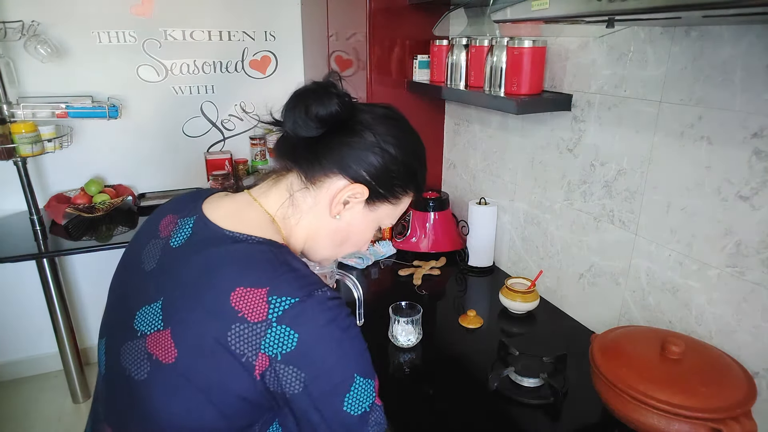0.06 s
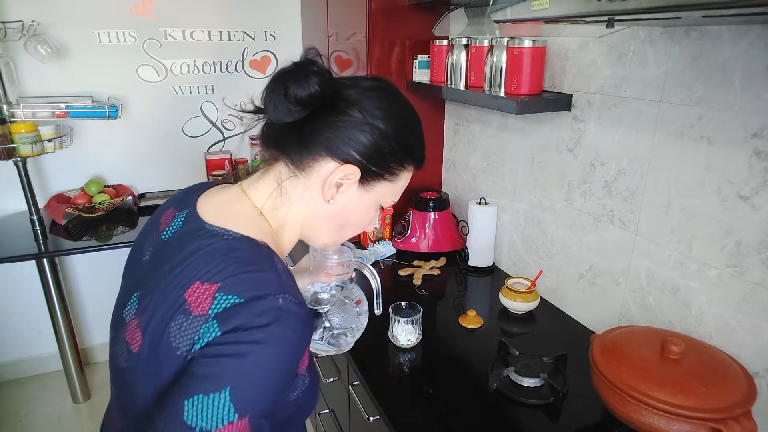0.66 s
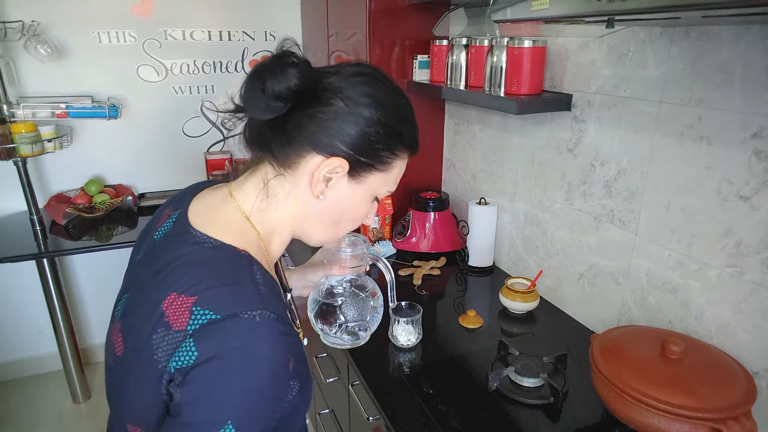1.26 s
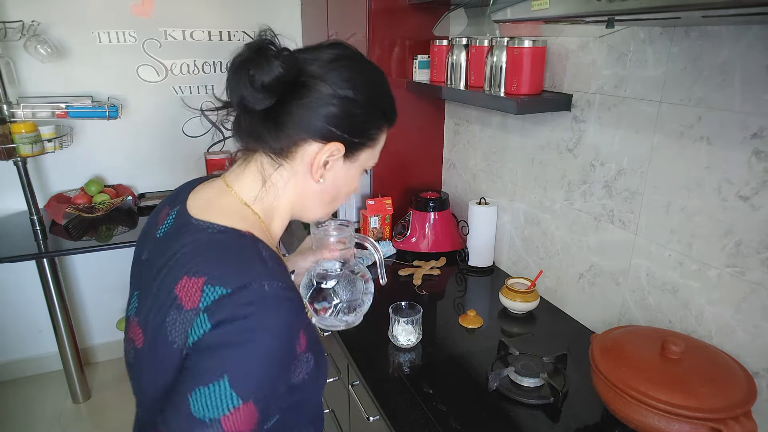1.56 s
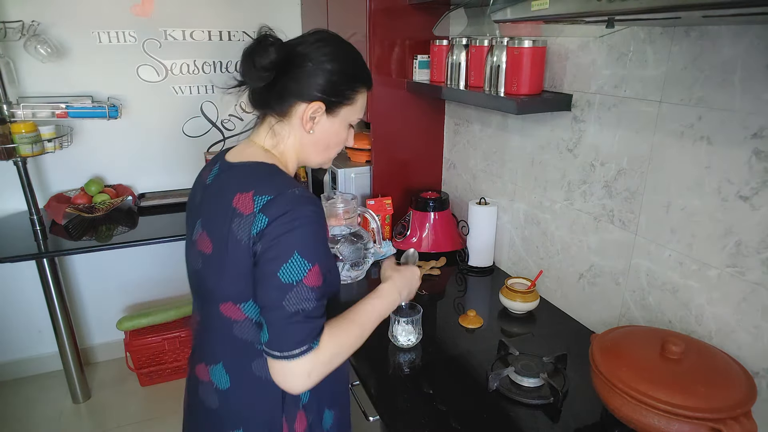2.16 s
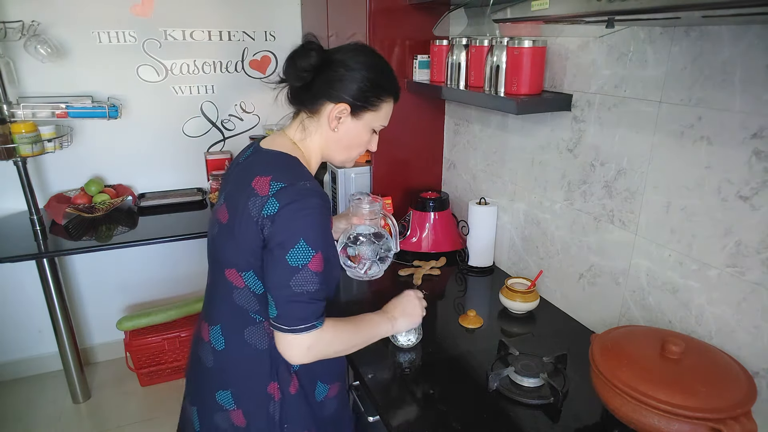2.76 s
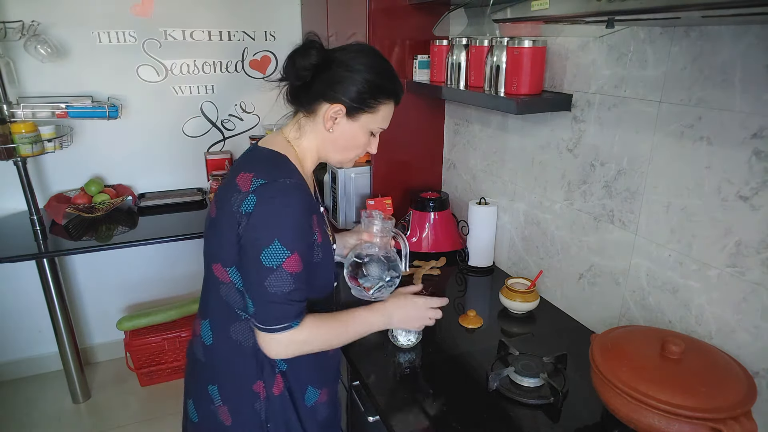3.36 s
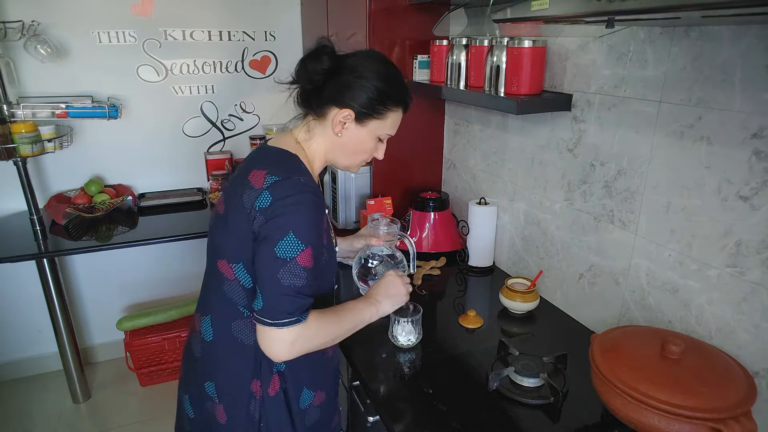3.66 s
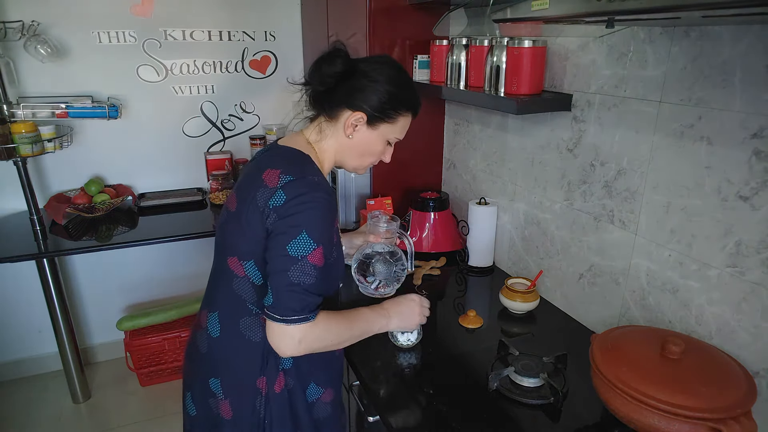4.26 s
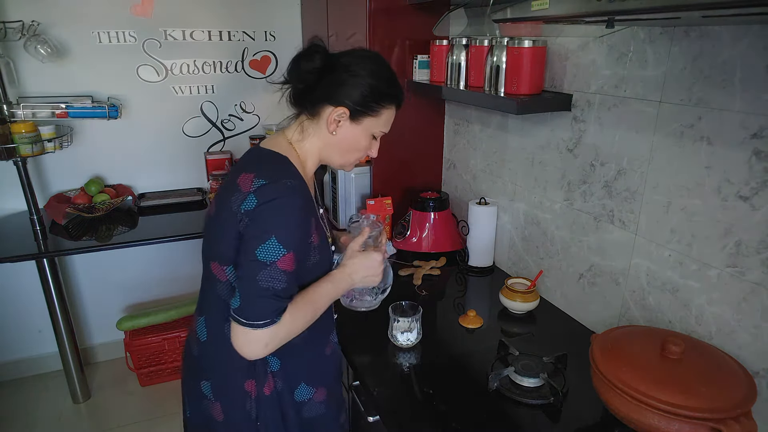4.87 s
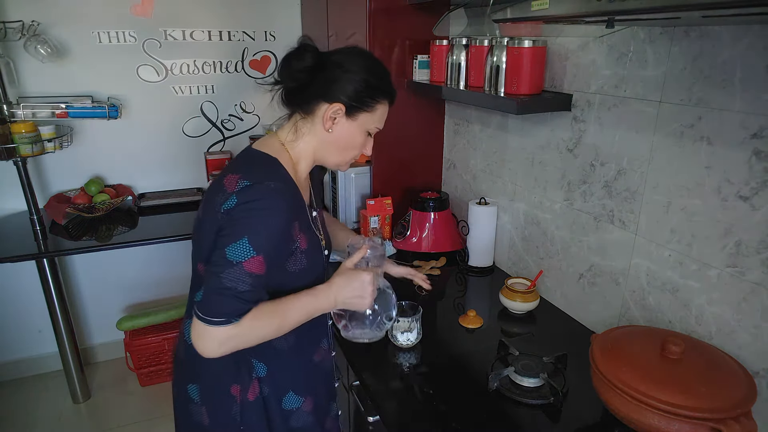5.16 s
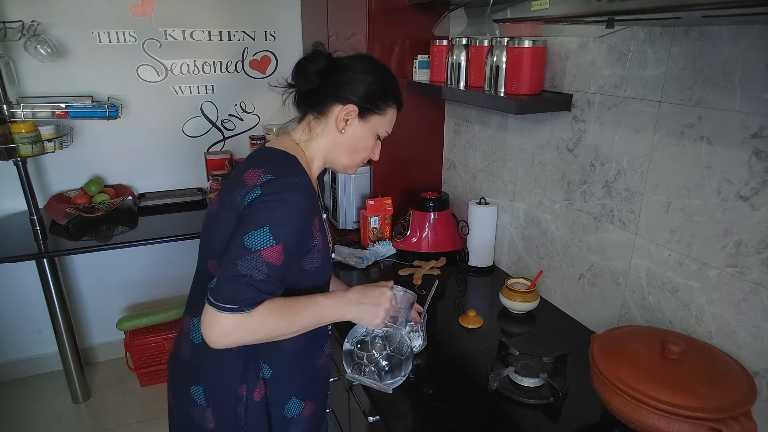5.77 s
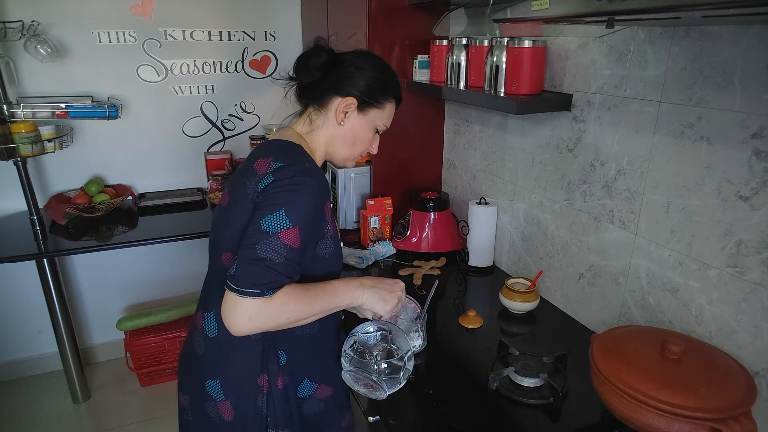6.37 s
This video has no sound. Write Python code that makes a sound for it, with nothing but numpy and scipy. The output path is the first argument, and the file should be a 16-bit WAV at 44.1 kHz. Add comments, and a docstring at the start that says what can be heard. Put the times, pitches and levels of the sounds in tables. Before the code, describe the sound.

In a hard-walled kitchen, steel cutlery jangles, a drawer closes, a spoon taps a glass and is set down, and a jug bumps softly.

```python
"""Cutlery rattles as a spoon is taken from a drawer; the drawer rumbles shut on its runners.
The spoon clinks in a drinking glass and is put down on the stone counter. A water jug changes hands
with dull bumps, and the glass is nudged along the counter. Contacts are damped modes and noise bursts;
friction is noise that swells with each slip. All is heard mostly through a hard-walled kitchen,
over a low rumble and a faint whirr."""
import sys
import numpy as np
from scipy import signal
from scipy.fft import rfft, irfft, next_fast_len
from scipy.io import wavfile
from scipy.ndimage import map_coordinates

SR = 44100
rng = np.random.default_rng(int(sys.argv[2]) if len(sys.argv) > 2 else 0)


def log_audio(samples):
    """Write samples as a 16-bit WAV file to the path given in sys.argv[1]."""
    # one column per channel
    frames = np.atleast_2d(samples).T
    # limit to full scale, then quantise
    limited = np.clip(frames, -1, 1)
    pcm = np.round(limited * 32767).astype(np.int16)
    wavfile.write(sys.argv[1], SR, pcm)


N = 282228
T = np.arange(int(.6 * SR)) / SR  # time axis of one contact or room tail, s
STEEL_BRIGHT_HZ = 16120

# Steel clash spectrum. Each row: frequency in Hz, relative density in dB.
CLASH_SPECTRUM = [(150, -80.5), (350, -33.5), (700, -7), (1000, -21), (1800, -6.5), (3800, -3), (4700, -7),
                  (5700, -1), (8000, -4), (9800, 1.5), (11000, 1), (15500, 3)]
# Dull bump spectrum. Each row: frequency in Hz, relative density in dB.
BUMP_SPECTRUM = [(35, -59), (75, -9), (115, 7.5), (160, -4.5), (200, -15.5), (270, 4.5), (360, -6.5),
                 (470, -15), (680, -17), (1000, -34), (3000, -46)]


def amp(db):
    """Decibels to gain."""
    return 10 ** (np.asarray(db) / 20)


def unit(x):
    """Scale to rms 1."""
    return x / np.sqrt(np.mean(x ** 2) + 1e-20)


def along(points, hz):
    """Interpolate (Hz, value) points on a log frequency axis."""
    knots_hz, values = np.transpose(points)
    return np.interp(np.log(hz + 1), np.log(knots_hz), values)


def filtered(x, response):
    """Zero-phase filter with gain response(hz)."""
    n = x.shape[-1]
    size = next_fast_len(n + SR // 10)
    return irfft(rfft(x, size) * response(np.fft.rfftfreq(size, 1 / SR)), size)[..., :n]


def noise(spectrum, size):
    """Coloured noise of rms 1."""
    return unit(filtered(rng.standard_normal(size), lambda hz: amp(along(spectrum, hz))))


def wobble(rate_hz):
    """Smooth random curve with knots at rate_hz."""
    knots = rng.standard_normal(int(N * rate_hz / SR) + 4)
    return map_coordinates(knots, [np.arange(N) * rate_hz / SR])


def diffuse(size):
    """White stereo noise, alike in the bass, unrelated in the treble."""
    # Each row: frequency in Hz, left-right correlation.
    coherence = [(30, 0.31), (70, 0.5), (250, .86), (500, 0.72), (900, 0.11), (1500, -0.18), (3000, -0.026),
                 (12000, -0.019)]

    def mid_side_gains(hz):
        angle = np.arccos(np.clip(along(coherence, hz), -1, 1)) / 2
        return np.array([np.cos(angle), np.sin(angle)])

    mid, side = filtered(rng.standard_normal((2, size)), mid_side_gains)
    return np.array([mid + side, mid - side])


def kitchen(x, direct_db=-8, build_s=0.00048, sparse_s=0.0078):
    """Weak direct sound, a few near reflections, a dense tail off tiles and stone; new per call."""
    # Each row: frequency in Hz, reverberation t60 in s.
    room_decay = [(100, 0.48), (400, 0.52), (1000, 0.48), (3000, 0.44), (7000, 0.38), (15000, 0.31)]
    hz, t, spectra = signal.stft(diffuse(len(T)), SR, nperseg=256)
    decay = amp(-60 * t / along(room_decay, hz)[:, None])
    tail = signal.istft(spectra * decay, SR, nperseg=256)[1][:, :len(T)]
    tail *= 1 - np.exp(-T / build_s)
    # early reflections arrive singly, then merge
    spikiness = np.exp(-T / sparse_s)
    tail *= np.exp(spikiness * rng.standard_normal(tail.shape) - spikiness ** 2)
    tail /= np.linalg.norm(tail, axis=1, keepdims=True)
    tail[:, 0] += amp(direct_db)
    return signal.fftconvolve(x[None], tail, axes=1)[:, :len(x)]


def add_in_room(out, start_s, x, direct_db=-8):
    """Mix contact x, with its reverberation, into out."""
    part = out[:, max(round(start_s * SR), 0):][:, :len(T)]
    part += kitchen(x, direct_db)[:, :part.shape[1]]


def blow(x, db):
    """Scale a contact to the energy of 30 ms at level db."""
    return amp(db) * x * np.sqrt(.03 * SR / np.sum(x ** 2))


def softness(hz, bright_hz):
    """Low-pass gain: a softer contact excites less treble."""
    return 1 / np.sqrt(1 + (hz / bright_hz) ** 4)


def ring(modes, bright_hz, scatter_db=1):
    """Decaying modes; their strengths vary slightly per contact."""
    hz, db, t60_s = np.transpose(modes)[:, :, None]
    gain = amp(db + scatter_db * rng.standard_normal(hz.shape)) * softness(hz, bright_hz)
    return np.sum(gain * amp(-60 * T / t60_s) * np.sin(2 * np.pi * hz * T), axis=0)


def burst(spectrum, t60_s, bright_hz=SR):
    """Many close, damped modes as decaying coloured noise."""
    return filtered(noise(spectrum, len(T)), lambda hz: softness(hz, bright_hz)) * amp(-60 * T / t60_s)


def flurry(start_s, length_s, count, scatter_db=4.0):
    """Unevenly spaced small contacts. Each row: time in s, level offset in dB."""
    chance = rng.random((count, 2))
    times_s = start_s + length_s * (np.arange(count) + chance[:, 0] / 2) / count
    return zip(times_s, scatter_db * (2 * chance[:, 1] - 1))


def rub(strokes, spectrum, attack_s, release_s, grain_db, slip_hz):
    """Friction in the room: strokes rise, hold and die away; the noise swells with each slip."""
    t = np.arange(N) / SR
    effort = np.zeros(N)
    for start_s, length_s, db in strokes:
        rise = np.clip((t - start_s) / attack_s, 0, 1)
        fall = np.exp(-np.maximum(t - start_s - length_s, 0) / release_s)
        effort += amp(db) * rise * fall
    friction = unit(noise(spectrum, N) * amp(grain_db * wobble(slip_hz)))
    return kitchen(effort * friction)


def room_noise(level_db=-60.0):
    """Steady low rumble and a faint whirr in a few broad bands."""
    # Each row: frequency in Hz, relative density in dB.
    air_spectrum = [(20, -13), (48, 12), (70, 0), (110, 0.5), (170, -7.5), (260, 3.5), (400, -5), (800, -8),
                    (1200, -10.5), (2300, -11.5), (3200, -23), (5500, -25), (12500, -24.5), (15500, -30)]
    # Each row: centre in Hz, width in Hz, relative peak in dB.
    whirr_bands = [(1463, 130, -5.5), (1803, 190, 0.5), (4257, 570, -12), (7380, 850, -18.5),
                   (10400, 430, -31.5)]

    def response(hz):
        whirr_power = sum(amp(db) ** 2 / (1 + (2 * (hz - centre_hz) / width_hz) ** 2) ** 2
                          for centre_hz, width_hz, db in whirr_bands)
        return np.sqrt(amp(along(air_spectrum, hz)) ** 2 + whirr_power)

    return unit(filtered(diffuse(N), response)) * amp(level_db)


def cutlery(stirred_ring_db=-4.5, bright_at_db=-19, db_per_octave=27):
    """Steel pieces clash and ring, damped by one another and screened by the drawer."""
    # Each row: start in s, clash level in dB, ring over clash in dB.
    contacts = [(0.001, -18.5, -6), (0.137, -22.5, -35), (0.149, -24, -9), (0.2129, -27.5, -16),
                (0.4262, -37, -7.5), (0.527, -43, -10.5), (1.932, -57.5, -7.5)]
    # The hand stirs the pieces. Each row: start in s, length in s, mean clash level in dB.
    rummages = [(0.062, 0.083, -36.5), (0.22, 0.062, -31), (0.304, 0.08, -46)]
    # Each row: frequency in Hz, relative level in dB, t60 in s.
    steel_modes = [(4200, -17, 0.29), (5510, 3, 0.0675), (5700, -16.5, .1), (9400, 1, 0.0757),
                   (8570, -5.5, 0.1), (9870, 6, 0.1), (12260, -15.5, .15), (12730, -14.5, 0.16),
                   (13200, -6.5, 0.066), (13600, -5, 0.1676), (14700, -19, 0.23), (14620, -11.5, 0.1034)]
    stirred = [(time_s, db + offset_db, stirred_ring_db)
               for start_s, length_s, db in rummages
               for time_s, offset_db in flurry(start_s, length_s, count=5)]
    out = np.zeros((2, N))
    for start_s, db, ring_db in contacts + stirred:
        bright_hz = STEEL_BRIGHT_HZ * 2 ** ((db - bright_at_db) / db_per_octave)  # harder is brighter
        clash = blow(burst(CLASH_SPECTRUM, t60_s=0.037, bright_hz=bright_hz), db)
        chime = blow(ring(steel_modes, bright_hz), db + ring_db)
        add_in_room(out, start_s, chime + clash, direct_db=-9.5)
    return out


def lifted_piece(start_s=0.538, level_db=-48.5):
    """One piece comes clear of the damping pile and rings thinly."""
    # Each row: frequency in Hz, relative level in dB, t60 in s.
    free_modes = [(4021, 5, 0.22), (7330, -13, 0.18), (9430, -2, 0.21), (12020, -15, 0.2),
                  (13840, -10, 0.17)]
    out = np.zeros((2, N))
    add_in_room(out, start_s, blow(ring(free_modes, STEEL_BRIGHT_HZ), level_db))
    return out


def drawer_and_jug_bumps(settle_s=5.06, settle_db=-49.5, fade_db_per_s=8):
    """Soft, ringless bumps; a last run of small ones fades as the jug settles in the hand."""
    # Each row: start in s, level in dB.
    bumps = [(0.679, -56), (1.224, -50.5), (1.529, -53.5), (2.334, -60), (3.264, -61), (4.866, -38.5),
             (4.882, -38.5), (4.949, -44.5), (5.192, -48)]
    settling = [(time_s, settle_db - fade_db_per_s * (time_s - settle_s) + offset_db)
                for time_s, offset_db in flurry(settle_s, length_s=0.55, count=8)]
    out = np.zeros((2, N))
    for start_s, db in bumps + settling:
        add_in_room(out, start_s, blow(burst(BUMP_SPECTRUM, t60_s=0.12), db))
    return out


def drawer_slide():
    """The drawer rumbles on its runners."""
    # Each row: start in s, length in s, level in dB.
    pushes = [(1.03, 0.051, -55), (1.07, 0.14, -52.5), (1.215, 0.088, -45.5), (1.325, 0.097, -47.5),
              (1.425, 0.036, -49)]
    # Each row: frequency in Hz, relative density in dB.
    runner_spectrum = [(70, -7.5), (190, -25), (255, 9.5), (330, -18), (400, 4), (490, -10), (580, -1.5),
                       (900, -8), (1150, -14.5), (1550, -9.5), (2300, -18.5), (3500, -15), (9000, -23.5),
                       (15500, -27)]
    return rub(pushes, runner_spectrum, attack_s=0.005, release_s=0.022, grain_db=1.5, slip_hz=140)


def arm_swish():
    """Cloth brushes lightly as the arm reaches over the glass."""
    # Each row: start in s, length in s, level in dB.
    strokes = [(2.31, 0.23, -64)]
    # Each row: frequency in Hz, relative density in dB.
    swish_spectrum = [(3000, -23.5), (6000, -10.5), (9500, 0.5), (12000, -8.5), (15500, -7.5)]
    return rub(strokes, swish_spectrum, attack_s=0.058, release_s=0.11, grain_db=7.5, slip_hz=50)


def glass_clinks(free_ring_db=10.5, weight_damping_db=19, free_knock_db=-16, weight_knock_db=15):
    """The spoon clacks, rings the glass and knocks the counter; weight trades ring for knock. The heavy knock
    at 5.38 s is the glass itself, just before it slides."""
    # Each row: start in s, clack level in dB, weight (0 free tap, 1 heavy contact), treble cutoff in Hz.
    clinks = [(2.728, -43.5, 0.044, 5900), (2.929, -39.5, 0.025, 14000), (2.9339, -32, 0.022, 14900),
              (3.8515, -46, 0.56, 3600), (4.296, -41.5, 0.27, 15000), (4.359, -26, 0.91, 3800),
              (4.371, -31, 0.64, 15500), (4.44, -44, 0.33, 2900), (5.38, -54.5, 1, 1920),
              (5.502, -63.5, 0.033, 10100), (5.572, -66, 0.076, 9000)]
    # Each row: frequency in Hz, relative level in dB, t60 in s.
    glass_modes = [(902, -19, 0.16), (2610, -7, 0.44), (2645, -14, 0.12), (3120, -20.5, 0.13),
                   (5992, -37, 0.085), (6358, -6, 0.13), (6358, 2.5, 0.045), (6840, -21, 0.061),
                   (8240, -21, 0.084), (9410, -18, .13), (10740, -7, .1), (10690, -3, .14),
                   (11680, -6, 0.11), (11950, -2, 0.067), (12000, -11.5, 0.19), (13600, -20, 0.18),
                   (14900, -12.5, .15), (15440, -17, .15)]
    # Each row of both: frequency in Hz, relative density in dB.
    clack_spectrum = [(150, -39), (300, -14), (600, -26), (900, -5), (1150, -10.5), (1600, -7.5),
                      (2500, 0.5), (3400, -9), (4200, -8), (5000, -17), (6500, -7.5), (8000, -39),
                      (11500, -9.5), (16000, -37)]
    counter_spectrum = [(40, -34.5), (110, -3.5), (165, -13.5), (280, -11), (390, -11), (520, -5.5),
                        (900, 4), (1200, -7), (1550, 2), (3000, -24), (8000, -62.5)]
    out = np.zeros((2, N))
    for start_s, db, weight, bright_hz in clinks:
        clack = blow(burst(clack_spectrum, t60_s=.022, bright_hz=bright_hz), db)
        knock = blow(burst(counter_spectrum, t60_s=0.14), db + free_knock_db + weight_knock_db * weight)
        chime = blow(ring(glass_modes, bright_hz), db + free_ring_db - weight_damping_db * weight)
        add_in_room(out, start_s, chime + clack + knock, direct_db=-10.5)
    return out


def spoon_ticks():
    """Held in the open, the spoon gives short, sharp ticks."""
    # Each row: start in s, ring level in dB, clash level in dB, treble cutoff in Hz.
    ticks = [(3.689, -47.5, -54.5, 7160), (3.8507, -50, -50, 3980)]
    # Each row: frequency in Hz, relative level in dB, t60 in s.
    spoon_modes = [(3160, -10, 0.24), (3970, -24, 0.09), (4060, 7, 0.054), (4740, 12.5, 0.035),
                   (5150, 3.5, 0.06), (5870, 13, 0.017), (8440, 5, 0.15), (8850, -8, 0.13)]
    out = np.zeros((2, N))
    for start_s, ring_db, clash_db, bright_hz in ticks:
        clash = blow(burst(CLASH_SPECTRUM, t60_s=0.031, bright_hz=bright_hz), clash_db)
        chime = blow(ring(spoon_modes, bright_hz), ring_db)
        add_in_room(out, start_s, chime + clash, direct_db=-4.5)
    return out


def sleeve_rustle():
    """A sleeve rubs as the jug changes hands."""
    # Each row: start in s, length in s, level in dB.
    strokes = [(4.72, 0.25, -59), (5.0, 0.3, -69.5)]
    # Each row: frequency in Hz, relative density in dB.
    cloth_spectrum = [(1000, -12), (2500, -4), (6000, 3.5), (10000, -4.5), (15500, -12)]
    return rub(strokes, cloth_spectrum, attack_s=0.19, release_s=0.099, grain_db=-3.5, slip_hz=98)


def glass_slide():
    """The foot of the glass chatters over stone."""
    # Each row: start in s, length in s, level in dB.
    nudges = [(5.375, 0.06, -54.5), (5.45, 0.087, -50.5), (5.57, 0.036, -54)]
    # Each row: frequency in Hz, relative density in dB.
    scrape_spectrum = [(400, -27), (700, -5), (1000, 5), (1220, -2.5), (1550, -0.5), (2100, -5), (2650, -2),
                       (3100, -27), (5400, -34), (6250, -8.5), (7500, -28), (10500, -19.5), (15000, -56)]
    return rub(nudges, scrape_spectrum, attack_s=0.012, release_s=0.009, grain_db=7.5, slip_hz=180)


def scene():
    """Stereo sum of contacts, friction and room noise."""
    contacts = cutlery() + lifted_piece() + drawer_and_jug_bumps() + glass_clinks() + spoon_ticks()
    friction = drawer_slide() + arm_swish() + sleeve_rustle() + glass_slide()
    return contacts + friction + room_noise()


def record(dry):
    """Steep low-pass at the band limit."""
    cutoff_hz = 15900
    return filtered(dry, lambda hz: 1 / (1 + (hz / cutoff_hz) ** 160))


dry = scene()
out = record(dry)
log_audio(out)
```